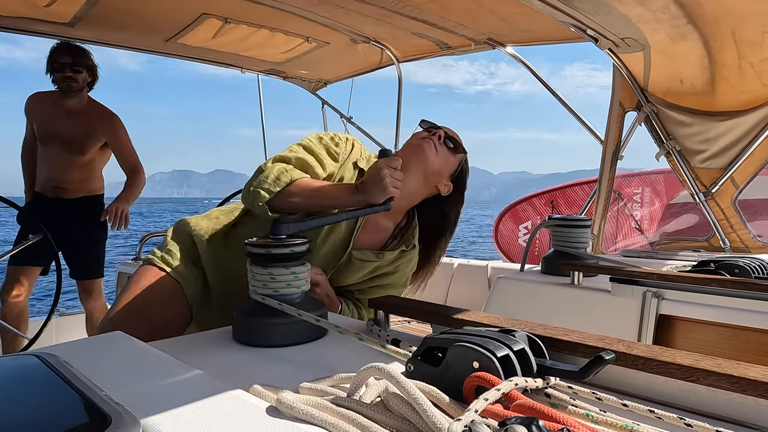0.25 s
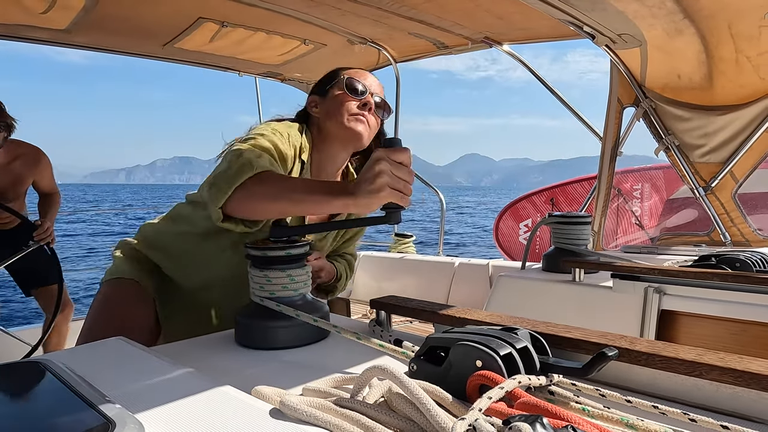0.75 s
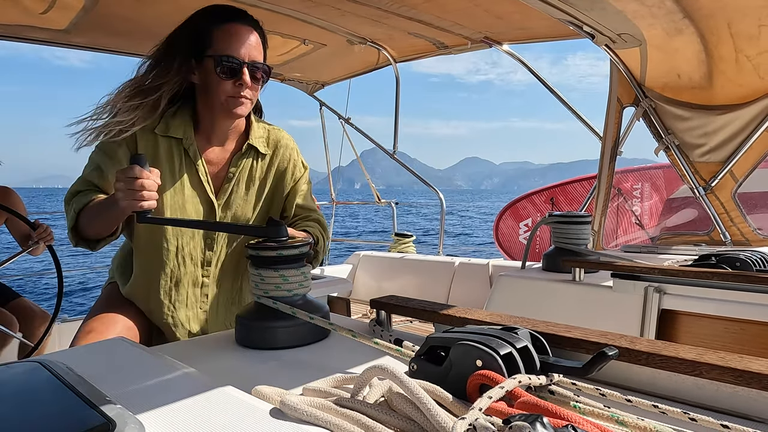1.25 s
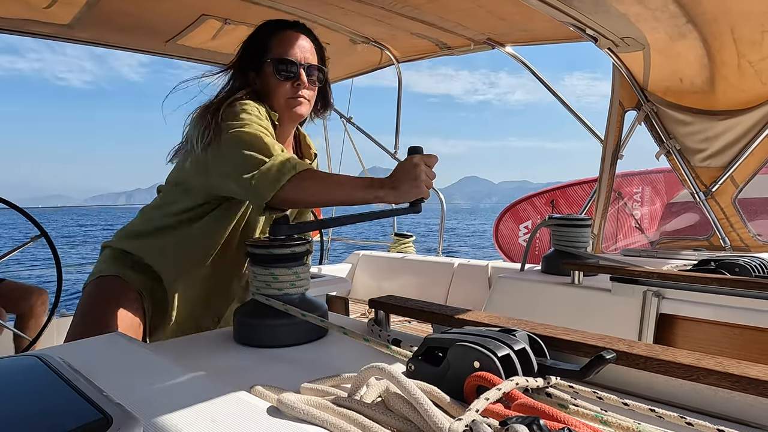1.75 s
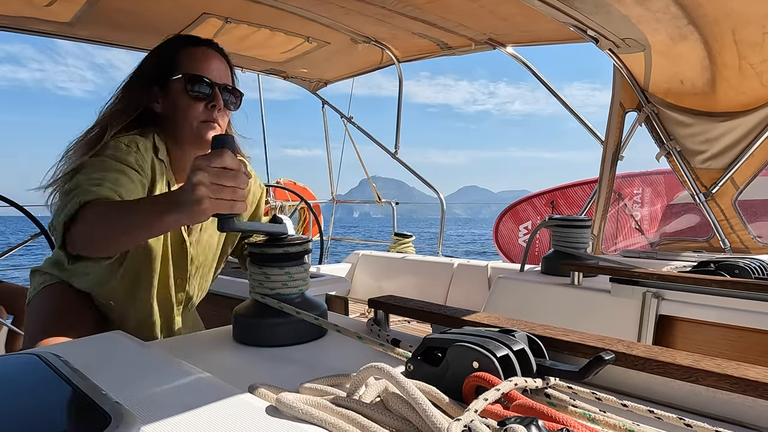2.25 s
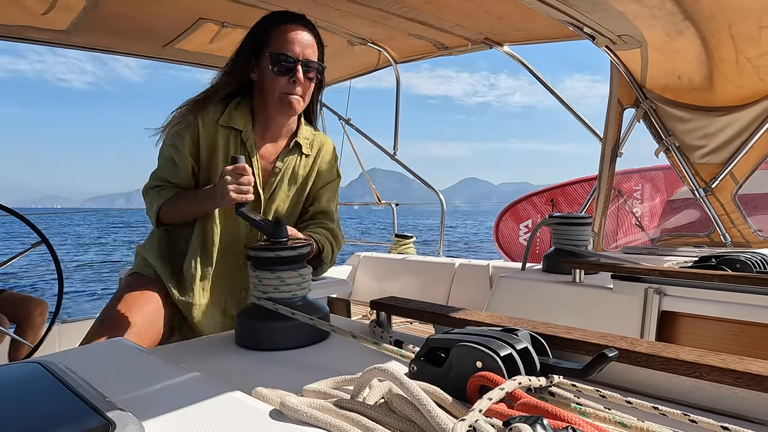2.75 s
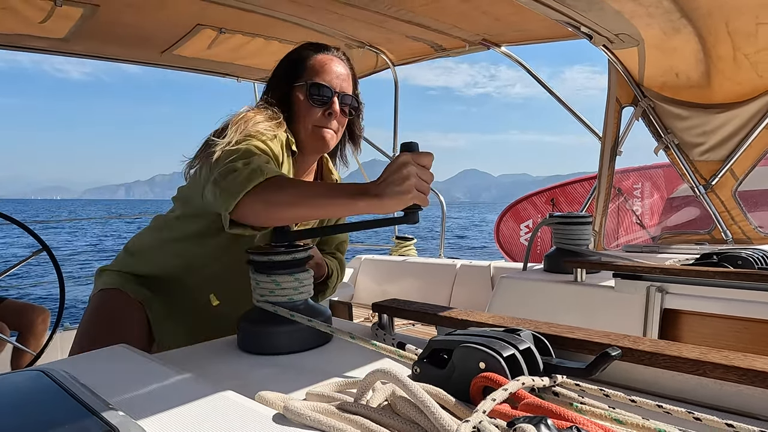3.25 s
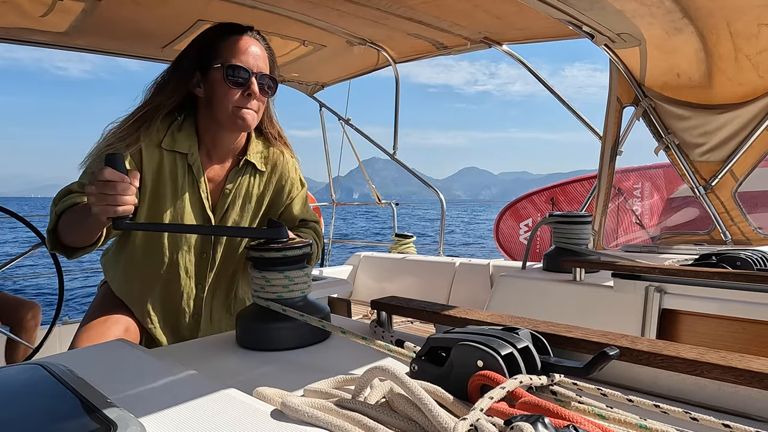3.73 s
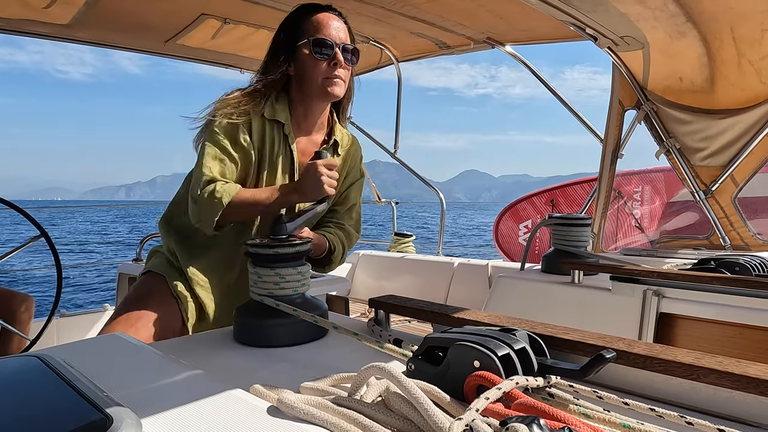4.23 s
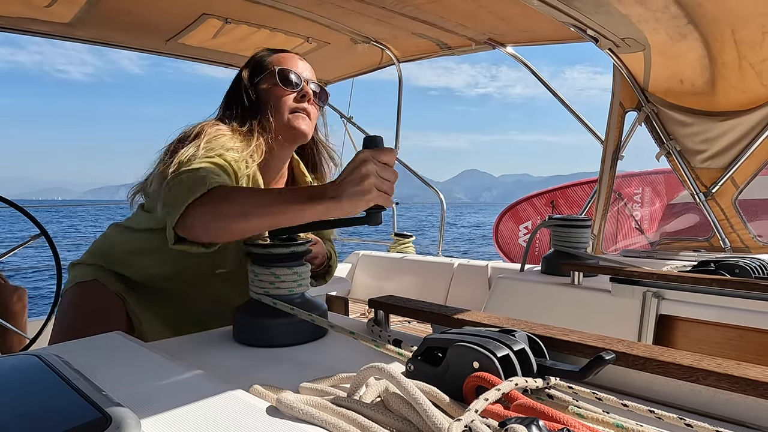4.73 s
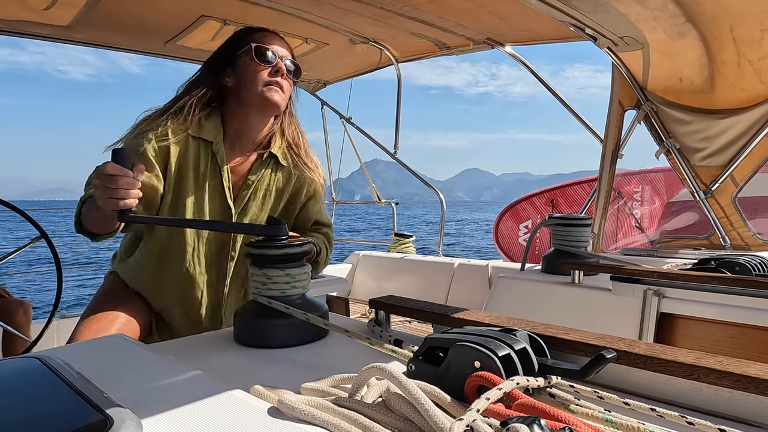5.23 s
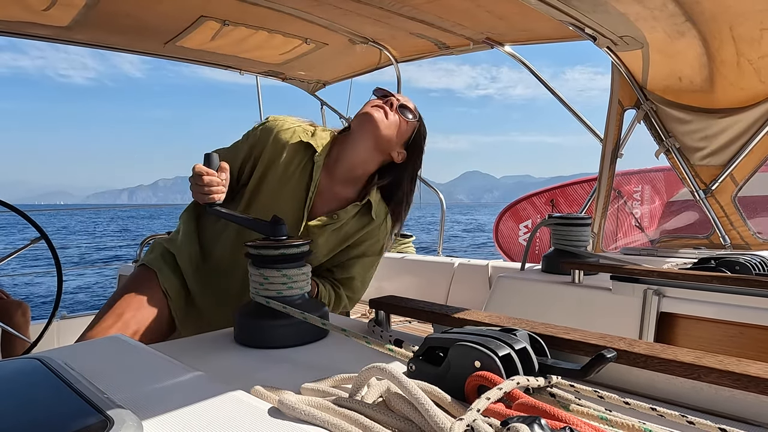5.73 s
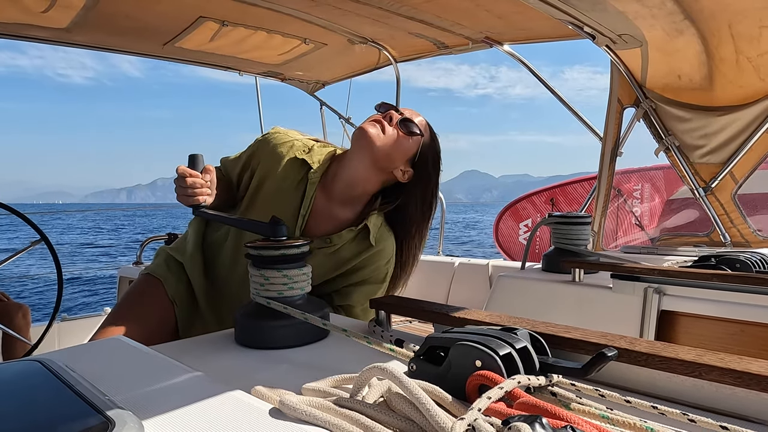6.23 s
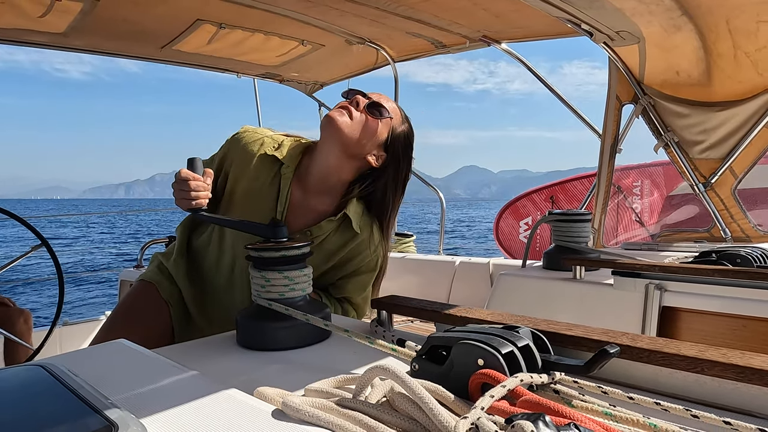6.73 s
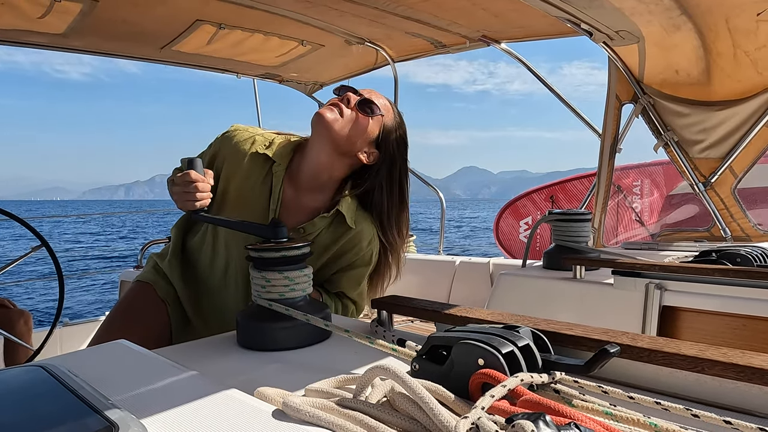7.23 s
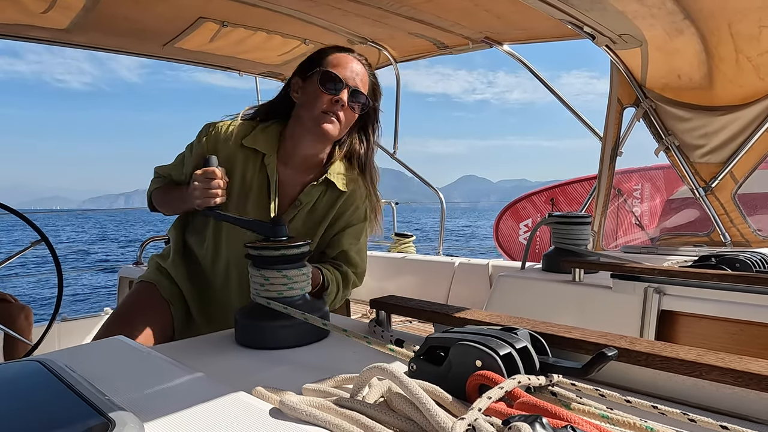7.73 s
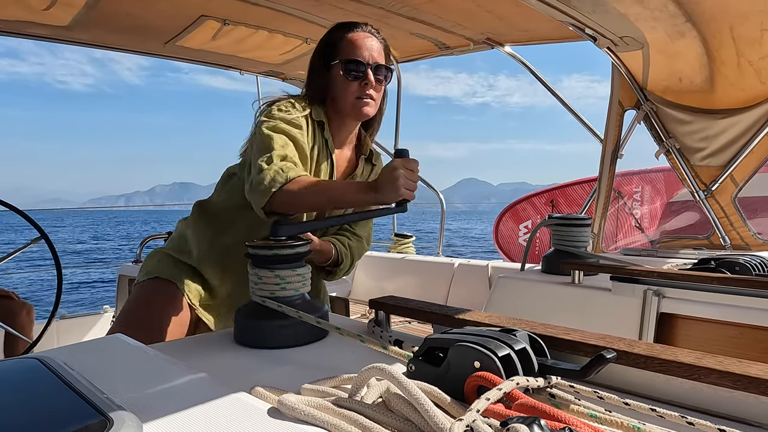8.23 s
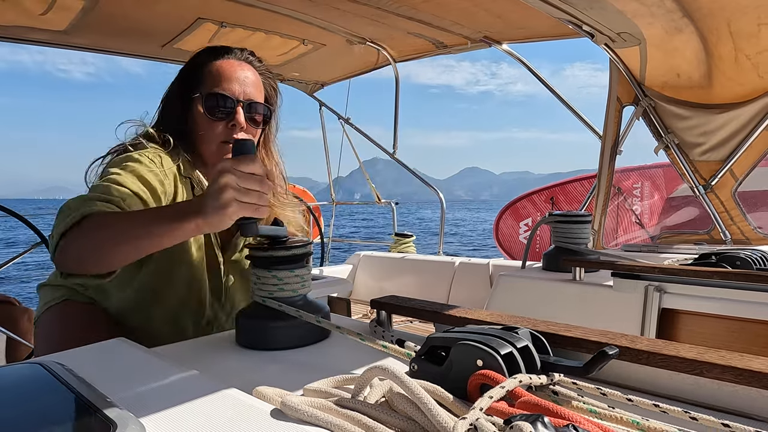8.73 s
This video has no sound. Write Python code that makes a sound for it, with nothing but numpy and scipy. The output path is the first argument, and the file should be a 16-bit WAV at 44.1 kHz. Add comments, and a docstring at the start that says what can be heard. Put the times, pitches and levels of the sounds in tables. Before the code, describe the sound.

Close view of a deck winch being ground in: crisp ratchet clicks with a short metal ring, slightly uneven in pace, pass over a deep engine drone, a mid-pitched gear whine and gentle hull wash. After nearly six seconds the clicking pauses for two seconds, with only faint rope rubs and a soft knock. Then cranking resumes to the end, with one strong thump. Dry outdoor stereo, winch loud and near, sea soft behind.

```python
"""Quick metallic clacks of a ratchet come in two runs over a low engine throb, a gear whine and washing water:
a sheet is ground in on a cockpit winch while a sailing boat motors along on a calm sea.
Pawls are bursts of noise contacts that ring damped drum modes; gears and rope are gritty noise;
deck knocks are decaying sines, engine and whine are sums of sines, and the sea is filtered noise."""
import sys
import numpy as np
from scipy import signal
from scipy.fft import rfft, irfft, next_fast_len
from scipy.io import wavfile
from scipy.ndimage import uniform_filter1d

SR = 44100
rng = np.random.default_rng(int(sys.argv[2]) if len(sys.argv) > 2 else 0)


def wav_out(sig):
    """Save sig, one row per channel (or a flat mono array), as 16-bit PCM at SR to the path in sys.argv[1]."""
    wavfile.write(sys.argv[1], SR, np.round(np.clip(np.atleast_2d(sig).T, -1, 1) * 32767).astype(np.int16))


N = 396018
T = np.arange(N) / SR  # time in s

# pawl drops, one for each tooth that passes: start_s, level_db
PAWL_DROPS = [(0.0219, -4), (0.2104, -5), (0.3396, -4), (0.441, -4.5), (0.607, -3.5), (0.7829, -3.5),
              (0.9083, -4), (1.048, -5), (1.1484, -4), (1.2242, -3.5), (1.2865, -4), (1.3395, -5.5),
              (1.3934, -4), (1.4534, -4), (1.5278, -2.5), (1.696, -5), (1.7743, -5), (1.8627, -5),
              (1.942, -4), (2.051, -3.5), (2.192, -3), (2.294, -3), (2.3999, -2), (2.4818, -1.5),
              (2.5522, -1.5), (2.6173, -2), (2.687, -4), (2.7836, -5.5), (2.8955, -3.5), (2.9787, -3),
              (3.0514, -2), (3.1152, -3), (3.2081, -3.5), (3.3059, -2.5), (3.3955, -2), (3.474, -3.5),
              (3.5723, -2), (3.6819, -3.5), (3.773, -3), (3.847, -4.5), (3.92, -2.5), (4.0022, -3.5),
              (4.121, -3), (4.2544, -4), (4.3569, -2), (4.4368, -4), (4.5001, -4), (4.6085, -3),
              (4.7184, -4), (4.8185, -4), (4.9314, -2), (5.0528, -2), (5.1723, -3.5), (5.2545, -3.5),
              (5.3363, -3.5), (5.413, -4), (5.5048, -4.5), (5.7473, -5), (8.0431, -5), (8.1626, -3),
              (8.2716, -2), (8.3619, -1.5), (8.4819, -1), (8.6178, -4), (8.7196, -3.5), (8.7865, -4.5),
              (8.8849, -3.5)]


def undb(db):
    """The decibel is logarithmic: 20 dB is a tenfold amplitude."""
    return 10 ** (np.asarray(db) / 20)


def unit(x):
    """Scale to an rms amplitude of 1, the root of the mean power."""
    return x / np.sqrt(np.mean(x ** 2))


def unit_energy(x):
    """Scale each channel to energy 1, the sum of its squares."""
    return x / np.sqrt(np.sum(x ** 2, axis=-1, keepdims=True))


def curve(table):
    """Linear interpolation turns rows of (s, value) into a continuous control."""
    return np.interp(T, *np.transpose(table))


def colour(x, points):
    """Minimum-phase filter with the given (Hz, dB) response, found by folding the cepstrum."""
    size = 2 * next_fast_len(x.shape[-1] // 2 + 1024)
    hz, db = np.transpose(points)
    freq = np.maximum(np.fft.rfftfreq(size, 1 / SR), 1)
    response_db = np.interp(np.log(freq), np.log(hz), db)
    cepstrum = irfft(np.log(undb(response_db)))
    # folding onto positive times makes the filter causal
    cepstrum[1:size // 2] *= 2
    cepstrum[size // 2 + 1:] = 0
    response = np.exp(rfft(cepstrum))
    return irfft(rfft(x, size) * response)[..., :x.shape[-1]]


def fade(t, t60):
    """Linear damping gives exponential decay, 60 dB down after t60 seconds."""
    return np.exp(-np.log(1000) * t / t60)


def walk(rate):
    """Slow random fluctuation: straight lines join normal values drawn `rate` times a second."""
    knots = rng.standard_normal(1024)
    return np.interp(T * rate, np.arange(len(knots)), knots)


def grit(size, spread_db):
    """Uneven contact modulates amplitude: a new random gain about every millisecond."""
    gains_db = spread_db * rng.standard_normal(size // 40 + 1)
    return undb(np.repeat(gains_db, 40)[:size])


def stereo_noise(size, side_db):
    """Partial coherence between the ears: common noise plus a part of opposite sign, side_db relative to it."""
    mid, side = rng.standard_normal((2, size))
    return mid + undb(side_db) * side * np.array([[1], [-1]])


def add(out, s, sound):
    """Superposition: mix a sound in at time s."""
    start = max(int(s * SR), 0)
    out[..., start:start + sound.shape[-1]] += sound[..., :N - start]


def sea(wash_db=-31.5, ripple_db=2.0, foam_db=-53, swell_db=3, fizz_db=5):
    """Broadband flow noise: dull hull rumble, rippling wash and foam that fizzes as wavelets break."""
    # hull rumble level: time_s, level_db
    rumble_level = [(0, -12), (.6, -16), (3.0, -17.5), (6.3, -20.5), (7.4, -21.5), (8.2, -19)]
    # hull rumble spectrum: frequency_hz, gain_db
    rumble_colour = [(15, -10.5), (30, 3), (60, 5.5), (110, 0.5), (175, 2.5), (215, -3), (290, -12.5),
                     (350, -19.5), (600, -47), (4000, -100)]
    # spectrum of water along the hull, plus a narrow noisy band near 610 Hz that skirts the gear whine:
    # frequency_hz, gain_db
    wash_colour = [(150, -14.5), (350, -3.5), (520, 7), (610, 15.5), (700, 3), (920, -1), (1150, -4.5),
                   (1900, -9), (2750, -18.5), (3200, -12.5), (3600, -19), (7500, -27.5), (9000, -34),
                   (12500, -34.5), (15000, -68)]
    rumble = unit(colour(stereo_noise(N, side_db=-62), rumble_colour))
    rippling = stereo_noise(N, side_db=-8) * undb(ripple_db * walk(30))
    wash = unit(colour(rippling, wash_colour))
    foam = stereo_noise(N, side_db=1.5) * grit(N, fizz_db) * undb(swell_db * walk(1.3))
    foam = unit(colour(foam, [(600, -5.5), (2000, 9.0), (7000, -3.5), (9000, -12), (15000, -31)]))
    return rumble * undb(curve(rumble_level)) + wash * undb(wash_db) + foam * undb(foam_db)


def diesel(firing_hz=33.92, unsteady_db=3.0, wander=0.0016):
    """Periodic forcing: firings shake the hull at multiples of their rate; the upper orders come and go."""
    # throb level: time_s, level_db
    throb_level = [(0.3, -7.5), (1.02, -8.5), (1.16, -11.5), (1.28, -8.5), (1.78, -12), (2.67, -8.5),
                   (4.66, -10), (4.99, -8.5), (8.9, -8.5)]
    # hull vibration: multiple of the firing rate, level_db
    hull_orders = [(1, 0.5), (2, -16.5), (2.5, -19), (3, -19.5), (4, -22), (5, -21)]
    phase = 2 * np.pi * np.cumsum(firing_hz * (1 + wander * walk(3))) / SR
    out = 0
    for multiple, order_db in hull_orders:
        order = np.round(2 * multiple) / 2  # whole and half orders
        waver_db = unsteady_db * walk(4) * (order > 1)
        out = out + undb(order_db + waver_db) * np.sin(order * phase + 2 * np.pi * rng.random())
    return np.sqrt(2) * undb(curve(throb_level)) * out


def whine(drift=0.0008, flutter_db=1.0, ear_phase=0.14):
    """Modulated gear mesh: a tone and sidebands one shaft turn apart, drifting together in pitch."""
    # gear tones: frequency_hz, level_db
    mesh_tones = [(441.4, -44), (576.6, -39), (600.3, -34.5), (623.9, -26.5), (647.5, -43.5), (916, -49)]
    # loudness of the whole whine: time_s, gain_db
    whine_gain = [(0, 2.5), (5.5, 2.5), (8.8, -1.5)]
    turn = np.cumsum(1 + drift * walk(5)) / SR
    ears = ear_phase * np.array([[1], [-1]])  # radians
    tones = 0
    for hz, db in mesh_tones:
        phase = 2 * np.pi * (hz * turn + rng.random()) + ears
        tones = tones + undb(db + flutter_db * walk(14)) * np.sin(phase)
    return np.sqrt(2) * undb(curve(whine_gain)) * tones


def gears(gain_db=-36, grain_db=4, swell_db=3, tick_db=-1, tick_spread_db=5):
    """Friction and impact noise: gears rub and loose teeth tick, louder in proportion to tooth rate."""
    drops = np.zeros(N)
    drops[(np.array(PAWL_DROPS)[:, 0] * SR).astype(int)] = SR
    rate = uniform_filter1d(uniform_filter1d(drops, SR // 6), SR // 10)  # teeth per second
    rub = stereo_noise(N, side_db=-22) * grit(N, grain_db)
    # about 150 small contacts a second, each over in a few ms
    contacts = (rng.random(N) < 150 / SR) * undb(tick_spread_db * rng.standard_normal(N))
    tick_envelope = signal.fftconvolve(contacts, fade(T[:SR // 50], 0.0082))[:N]
    ticks = stereo_noise(N, side_db=0.5) * tick_envelope
    grind = (unit(rub) + undb(tick_db) * unit(ticks)) * undb(swell_db * walk(14))
    grind_colour = [(400, 0), (1000, 9.0), (2000, 0.5), (4000, -1.5), (7000, -6.5), (14000, -16.5)]
    grind = unit(colour(grind, grind_colour))
    return undb(gain_db) * np.maximum(rate / 10, 0) * grind


def pawl(chatter_s, tilt_db, scatter_db=2.0, detune=0.005, clack_db=3, clack_t60=0.016,
         ear_phase=0.35, patchy_db=3.0, onset_power=1.52):
    """Impact excitation of modes: a run of tiny bounces, each giving a clack and ringing the drum."""
    # winch drum and gears: frequency_hz, level_db, t60_s
    drum_modes = [(916.7, -4, 0.08), (1066, -3, 0.063), (1303, 1, 0.025), (1939.4, 2, 0.028),
                  (2102, -6.5, 0.02), (2425, -6.5, 0.033), (2805, -2, 0.045), (3290, 2.5, 0.025),
                  (3540, -1.5, 0.042), (3768, -0.5, 0.014), (4130, 0.5, 0.035), (4290, -4, 0.032),
                  (5537, 1, 0.029), (5810, -1.5, 0.023), (6330, -11, 0.044), (6280, -14, 0.046),
                  (7150, -6, 0.051), (9430, -9.5, 0.11), (9230, 1, 0.024), (9800, -6, 0.06),
                  (10300, 0, 0.017), (10020, 0, 0.026), (11240, -10.5, 0.018), (11670, -5.5, 0.018),
                  (12400, -7.5, 0.032), (12500, -14.5, 0.032), (15700, -16, 0.033)]
    # dry clack of pawl on tooth: frequency_hz, gain_db
    clack_colour = [(300, -10.5), (700, -3), (1100, -5.5), (2000, 0), (2500, -5.5), (4000, -1),
                    (4700, -4.5), (7000, -6.5), (8400, -10.5), (10000, -10.5), (13000, -23), (14500, -24),
                    (15500, -25), (17000, -53)]
    t = T[:SR // 12]
    hz, db, t60 = np.transpose(drum_modes)[:, :, None]
    size, shift, lag = rng.standard_normal((3, len(drum_modes), 1))
    # the bounces swell quickly, then die out
    age = t / chatter_s
    contact = age ** onset_power * np.exp(-age ** 2)
    bounces = rng.standard_normal(len(t)) * contact * grit(len(t), patchy_db)
    strike = stereo_noise(len(t), side_db=-7.0) * fade(t, clack_t60)
    clack = signal.fftconvolve(bounces[None], strike, axes=-1)[:, :len(t)]
    clack = unit_energy(colour(clack, clack_colour))
    # the ring builds up while the bounces last; the modes shift a little from drop to drop
    build = np.sqrt(np.cumsum(contact ** 2) / np.sum(contact ** 2))
    phase = 2 * np.pi * (hz * (1 + detune * shift) * t + rng.random((len(drum_modes), 1)))
    modes = undb(db + scatter_db * size) * unit_energy(build * fade(t, t60))
    ring = np.array([np.sum(modes * np.sin(phase + ear * ear_phase * lag), axis=0) for ear in (1, -1)])
    # four octaves from 1 to 16 kHz carry the tilt
    sound = colour(unit_energy(ring) + undb(clack_db) * clack, [(1000, -2 * tilt_db), (16000, 2 * tilt_db)])
    return unit_energy(sound)


def winch(gain_db=18.5, lead_share=.3):
    """Ratchet impacts: faster cranking shortens the contact, so its drops are shorter and brighter."""
    # after a rest the pawls fall out of step and chatter longer: start_s, end_s, extra_chatter_s
    restarts = [(0, .5, .0015), (8.0, 8.67, 0.0037)]
    # gears slam across their slack and rebound: start_s, level_db, chatter_s, tilt_db_per_octave
    clunks = [(1.59, 20, 0.0089, -1), (1.614, 18, 0.0099, 1.5)]
    # level difference, left over right: frequency_hz, difference_db
    ear_difference = [(900, 3), (1300, 1), (2000, 3), (4500, 1), (8000, 1.5), (9300, 3), (11700, 6),
                      (14000, 20), (15300, -11.5)]
    # chatter lasts a fixed time plus a share of the time that the tooth takes to pass
    base_chatter_s, chatter_share, slowest_tooth_s = .0036, .011, .19
    # treble tilt in dB per octave: at a standstill, gain per tooth a second, and random scatter
    still_tilt_db, tilt_per_rate_db, tilt_scatter_db = -0.48, 0.09, 0.42
    out = np.zeros((2, N))
    tooth_times = np.minimum(np.diff(np.array(PAWL_DROPS)[:, 0], prepend=-1), slowest_tooth_s)
    for (s, db), tooth_s in zip(PAWL_DROPS, tooth_times):
        extra_s = sum(extra for start, end, extra in restarts if start <= s < end)
        chatter_s = base_chatter_s + chatter_share * tooth_s + extra_s
        tilt_db = still_tilt_db + tilt_per_rate_db / tooth_s + tilt_scatter_db * rng.standard_normal()
        # each clack starts to swell just ahead of the listed time
        add(out, s - lead_share * chatter_s, undb(db + gain_db) * pawl(chatter_s, tilt_db))
    for s, db, chatter_s, tilt_db in clunks:
        add(out, s - lead_share * chatter_s, undb(db) * pawl(chatter_s, tilt_db))
    # each ear takes half of the difference
    return np.array([colour(x, [(hz, ear * db / 2) for hz, db in ear_difference])
                     for x, ear in zip(out, (1, -1))])


def rope(grain_db=4):
    """Sliding friction: gritty noise scuffs as the loaded rope shifts."""
    # rope shifting on the drum and deck: start_s, level_db, t60_s
    scuffs = [(0.121, -30, 2.4), (1.101, -29.5, 0.51), (1.606, -15, 0.28), (5.667, -16.5, 0.081),
              (5.684, -23.5, 0.33), (6.098, -29, 0.11), (6.2567, -29, 0.24), (6.815, -25.5, 0.12),
              (7.851, -18.5, 0.059), (7.898, -14, 0.027), (8.643, -6, 0.027)]
    # spectrum of rope on drum and deck: frequency_hz, gain_db
    scuff_colour = [(150, 0), (400, 10), (900, 10), (2300, 2), (4000, -10), (7000, -15), (10000, -48),
                    (16000, -34.5)]
    out, t = np.zeros((2, N)), T[:SR // 3]
    for s, db, t60 in scuffs:
        rubbing = stereo_noise(len(t), side_db=-9.5) * grit(len(t), grain_db)
        scuff = unit(colour(rubbing, scuff_colour))
        add(out, s, undb(db) * scuff * fade(t, t60) * (1 - fade(t, 0.0032)))
    return out


def deck():
    """Damped resonance: each knock sets one panel of the deck booming as a decaying sine."""
    # knocks on the moulded deck: start_s, pitch_hz, level_db, t60_s
    knocks = [(0.143, 41.3, -3, 0.28), (0.225, 186.3, -5, 0.43), (1.132, 103.6, -4.5, 0.47),
              (1.189, 181, -7, 0.46), (1.534, 157, -9, 0.2), (1.597, 302.4, -4, 0.24),
              (1.654, 288, -7, 0.27), (2.55, 311, -14.5, 0.17), (2.87, 278, -12, 0.19),
              (4.38, 113, -7, 0.37), (5.67, 241, -3.5, 0.081), (6.29, 126, -9, 0.32),
              (7.874, 176, -8.5, 0.15), (8.646, 179.4, 13.5, 0.072)]
    out, t = np.zeros((2, N)), T[:SR // 2]
    for s, hz, db, t60 in knocks:
        envelope = fade(t, t60) * (1 - fade(t, 0.05))
        add(out, s, undb(db) * np.sin(2 * np.pi * hz * t) * envelope)
    return out


def cockpit(x, wet_db, t60):
    """Diffuse scattering: seats, deck and canopy add a short tail, convolved with the direct sound."""
    t = T[:SR // 3]
    tail = stereo_noise(len(t), side_db=-11.5) * fade(t, t60) * (1 - fade(t, 0.058))
    tail = unit_energy(colour(tail, [(500, 1.0), (4000, 0.5), (8000, 2.0), (14000, -2.5)]))
    return x + undb(wet_db) * signal.fftconvolve(x, tail, axes=-1)[:, :N]


def scene():
    """Superposition: winch, gears and rope under the canopy, over deck knocks, engine and sea."""
    sheltered = cockpit(winch() + gears() + rope(), wet_db=-10.0, t60=0.098)
    return sheltered + deck() + diesel() + whine() + sea()


def record(dry):
    """Clipping and band limiting: peaks flatten at full scale, then an elliptic low-pass cuts the top."""
    top_hz = 15800
    low_pass = signal.ellip(8, .2, 70, top_hz, fs=SR, output="sos")
    return signal.sosfilt(low_pass, np.clip(dry, -1, 1))


dry = scene()
out = record(dry)
wav_out(out)
```